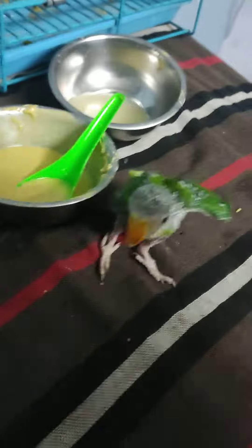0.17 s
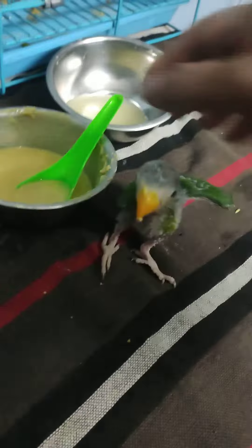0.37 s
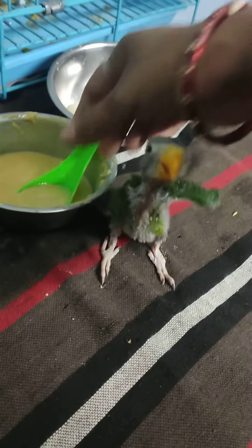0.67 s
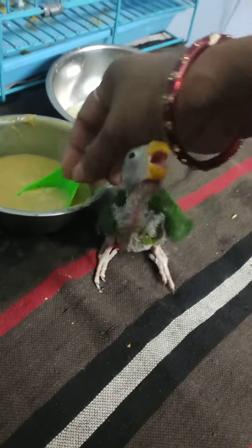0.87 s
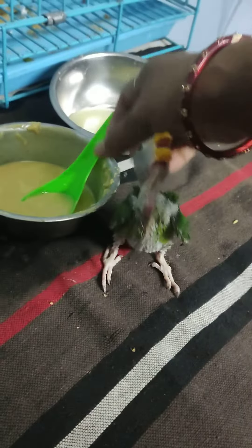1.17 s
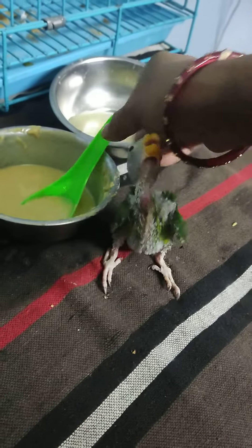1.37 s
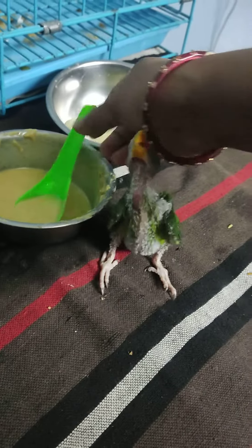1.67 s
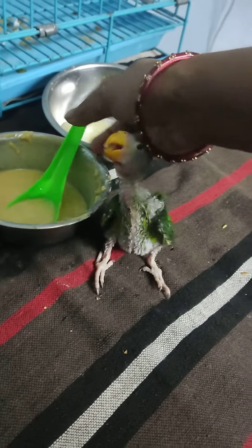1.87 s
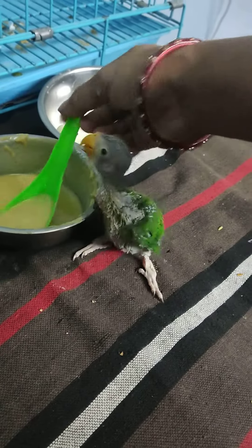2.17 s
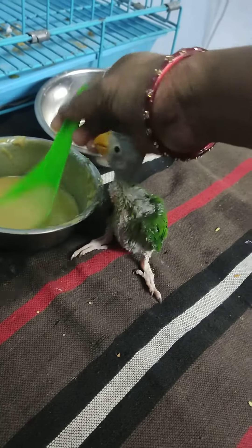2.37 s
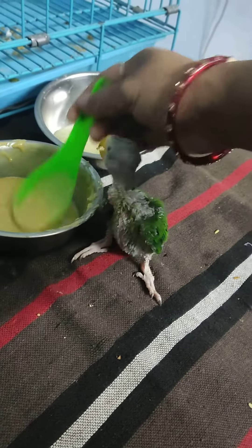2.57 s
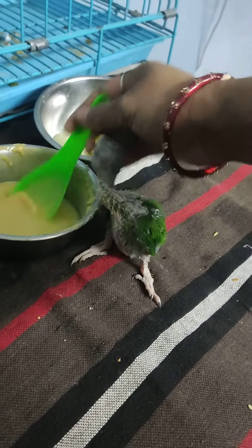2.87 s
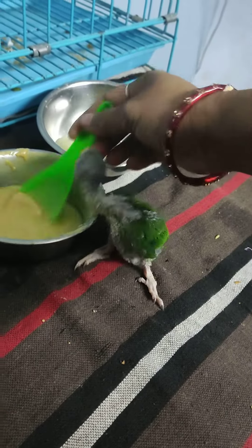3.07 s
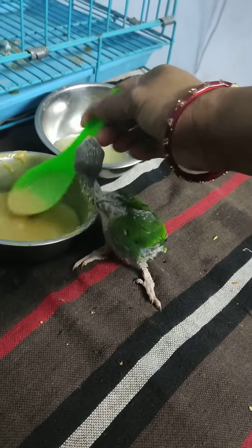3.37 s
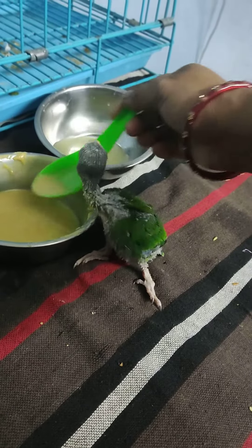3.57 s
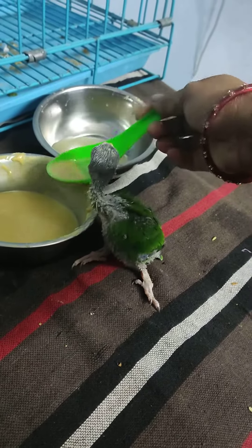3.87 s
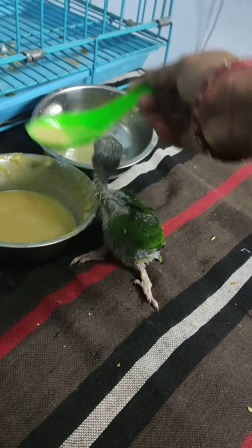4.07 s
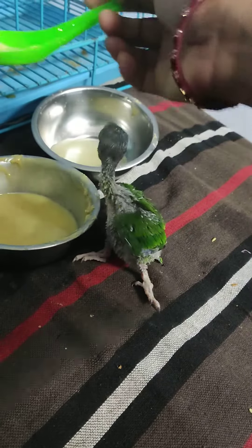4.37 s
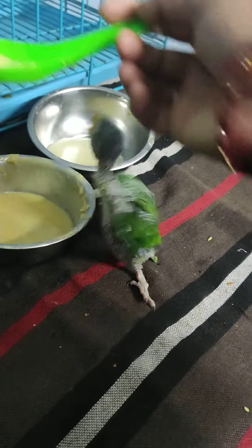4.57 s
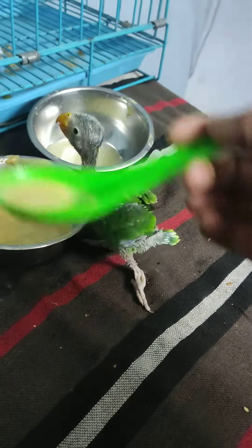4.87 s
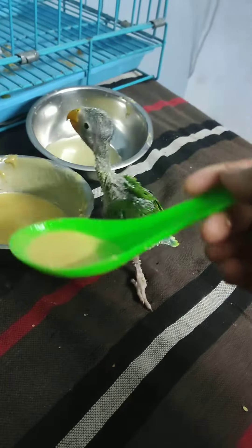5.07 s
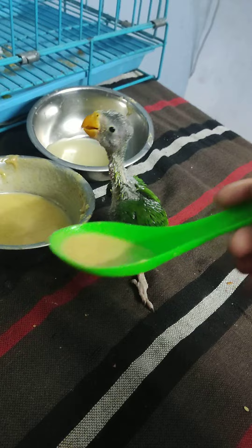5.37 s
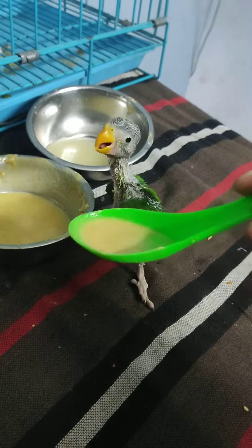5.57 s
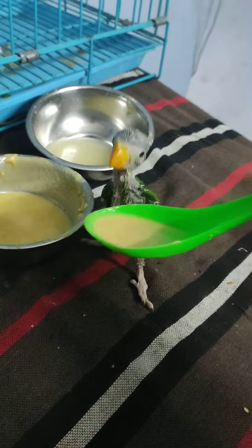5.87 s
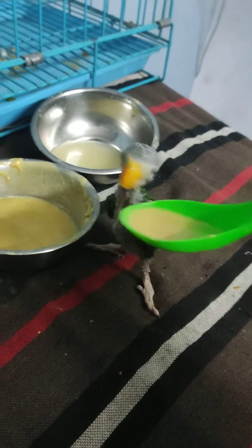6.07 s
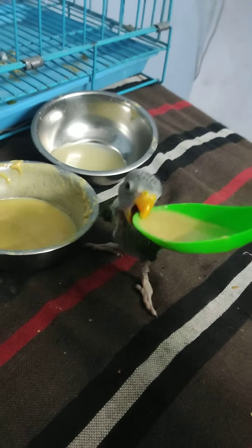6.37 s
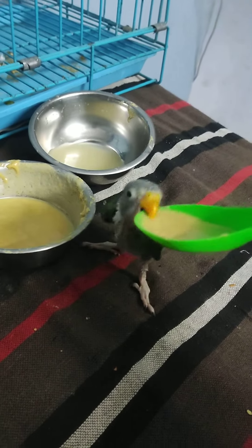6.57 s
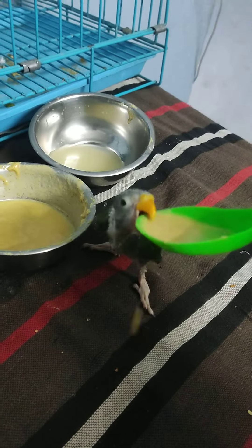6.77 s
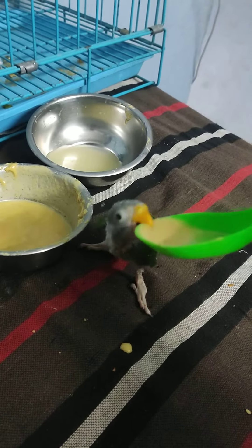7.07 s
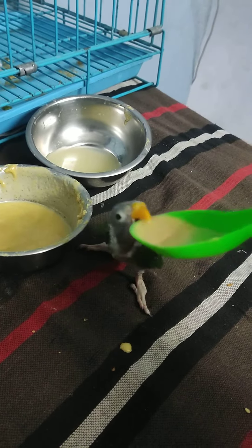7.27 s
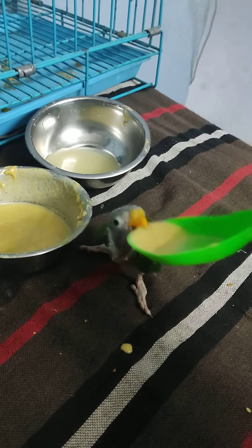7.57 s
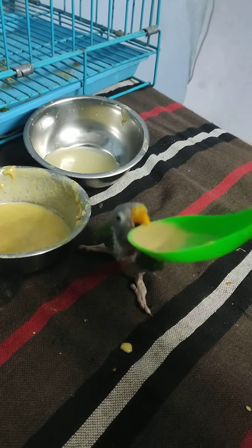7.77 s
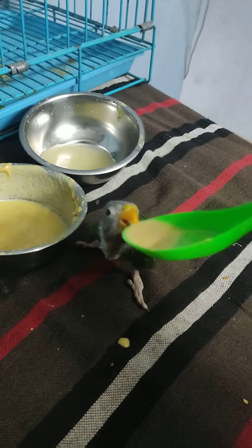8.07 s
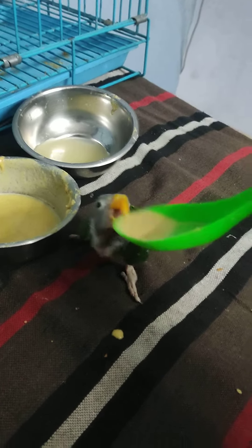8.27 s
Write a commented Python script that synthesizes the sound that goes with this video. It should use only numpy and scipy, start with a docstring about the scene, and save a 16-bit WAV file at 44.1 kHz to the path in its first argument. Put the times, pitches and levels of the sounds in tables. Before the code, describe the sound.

Young parrot chicks give raspy, rising begging cries about once a second in a small room, over dull air noise and hand rumble.

```python
"""Parrot chicks beg beside steel bowls in a small room, over dull air noise, a wavering hum and hand rumble.
The input fades up; beak and claw ticks, soft scuffs and bumps of fingers on the hand-held recorder follow.
Cries: harmonic partials and pulsed noise pass a throat and beak filter. Each opens in a rasp, clears into
a rising whistle, breaks hoarse, flicks up and collapses; a second voice overlaps some.
Air, rumble, ticks and scuffs are filtered noise; bumps are short pulses; the hum is a sine."""
import sys
import numpy as np
from scipy import signal
from scipy.fft import rfft, irfft, next_fast_len
from scipy.io import wavfile
from scipy.ndimage import uniform_filter1d

SR = 44100
rng = np.random.default_rng(int(sys.argv[2]) if len(sys.argv) > 2 else 0)


def store_pcm(level_fs):
    """Save levels as 16-bit WAV."""
    pcm = np.round(np.clip(level_fs, -1, 1) * 32767).astype(np.int16)
    wavfile.write(sys.argv[1], SR, np.atleast_2d(pcm).T)


N = 370881
TIME = np.arange(N) / SR
CUTOFF_HZ = 14450


def from_db(db):
    """Decibels to gain."""
    return 10 ** (np.asarray(db) / 20)


def rms_one(x):
    """Scale to rms 1."""
    return x / np.sqrt(np.mean(x ** 2) + 1e-20)


def at_hz(points, hz):
    """Interpolate a table over log frequency."""
    knots_hz, values = np.transpose(points)
    return np.interp(np.log(np.maximum(hz, 1)), np.log(np.maximum(knots_hz, 1)), values)


def shaped(x, gain):
    """Filter by a gain that is a function of frequency."""
    size = next_fast_len(x.shape[-1] + 2048)   # padding limits wrap-around
    spectrum = rfft(x, size) * gain(np.fft.rfftfreq(size, 1 / SR))
    return irfft(spectrum, size)[..., :x.shape[-1]]


def wobble(size, rate_hz):
    """Low-passed random motion, -6 dB at rate_hz; rms 1."""
    return rms_one(shaped(rng.standard_normal(size), lambda hz: 1 / (1 + (hz / rate_hz) ** 2)))


def swells(rows):
    """Sum of Gaussian rises of level; rows of centre/s, standard deviation/s, peak/dB."""
    return sum(from_db(db) * np.exp(-.5 * ((TIME - s) / sd_s) ** 2) for s, sd_s, db in rows)


def step(t, width_s):
    """A smooth step from 0 to 1 around time 0."""
    return .5 + .5 * np.tanh(t / (2 * width_s))


def room_noise(air_db=-49.5, hum_hz=196, hum_db=-63, swell_db=-1):
    """Steady dull air noise, alike at both ports in the bass, and a hum wavering in pitch and level."""
    # air noise spectrum: f/Hz, relative density/dB
    air_colour = [(15, -26.5), (25, 0), (81, -7.5), (161, -9.5), (184, -11), (216, -13.5), (247, -8.5),
                  (275, -12), (432, -14.5), (468, -16.5), (959, -17), (2020, -25), (3180, -34), (5130, -35),
                  (14500, -54.5)]
    # likeness of air noise at the two ports: f/Hz, correlation/1 (negative values act as 0)
    air_likeness = [(60, 0.49), (180, 0.87), (550, 0.058), (1650, -0.08), (4970, -0.03), (15000, -0.12)]
    # hum swells: centre t/s, standard deviation/s, peak level/dB before swell_db
    hum_swells = [(0.92, 0.068, -49.5), (4.25, 0.067, -54), (5.38, 0.033, -52), (6.2, 0.047, -44)]

    def coloured(sign):
        """Noise that the ports share (sign > 0) or hear in opposition (sign < 0)."""
        def gain(hz):
            """Air colour, split by likeness."""
            likeness = np.clip(at_hz(air_likeness, hz), 0, .95)
            return from_db(at_hz(air_colour, hz)) * np.sqrt(1 + sign * likeness)
        return shaped(rng.standard_normal(N), gain)

    opposed = coloured(-1.1) * np.array([[1], [-1]])
    air = rms_one(coloured(1) + opposed)
    phase = 2 * np.pi * np.cumsum(hum_hz * (1 + .015 * wobble(N, 12))) / SR
    hum_level = from_db(hum_db + 3.6 * wobble(N, 4.6)) + from_db(swell_db) * swells(hum_swells)
    hum = np.sqrt(2) * np.sin(phase) * hum_level
    return from_db(air_db) * air + hum


def handling(hold_db=-52, left_db=-1, right_db=-11, bump_db=-1, lumps_db=3, bump_leak=0.067):
    """The hand rumbles (low-passed noise) and fingers bump on the case, mostly at the left port."""
    # rumble spectrum before the 600 Hz roll-off: f/Hz, relative density/dB
    grip_colour = [(12, -30.5), (20, 3), (84, -1.5), (241, -12), (325, -20.5), (354, -25.5), (559, -21),
                   (600, -41), (780, -65), (1320, -120)]
    # grip shifts: centre t/s, standard deviation/s, peak level/dB before the port gains
    shifts = [(.15, .09, -43), (.49, 0.046, -39), (.75, 0.12, -39.5), (1.38, 0.037, -38.5), (1.6, .13, -47),
              (2.06, .07, -46), (2.55, 0.028, -46), (2.79, 0.063, -37.5), (3.48, 0.092, -38),
              (3.97, .03, -41.5), (4.2, .08, -41), (4.38, 0.043, -36), (4.76, 0.046, -45), (5.08, .05, -44),
              (5.49, 0.085, -39.5), (6.26, 0.11, -48), (6.75, .05, -42.5), (7.07, 0.064, -36.5),
              (7.52, 0.16, -38.5), (8.28, .1, -42.5)]
    # finger bumps: t/s, peak level/dB before bump_db, pulse f/Hz
    bump_rows = [(0.501, -25, 93), (0.677, -25, 74), (0.974, -26.5, 94), (1.344, -25.5, 87),
                 (1.362, -21.5, 93), (1.425, -24, 88), (2.763, -25.5, 130), (2.815, -23, 120),
                 (3.454, -23, 95), (4.348, -26, 102), (4.393, -21.5, 142), (6.963, -24, 63),
                 (7.047, -20.5, 66), (7.07, -23.5, 55), (7.315, -24, 63), (7.413, -24, 152)]

    # hold_db: resting hand, before the port gains; lumps_db: rms level unevenness
    level = (from_db(hold_db) + swells(shifts)) * from_db(lumps_db * wobble(N, 35))

    def grip_gain(hz):
        """Gain of hand on case."""
        return from_db(at_hz(grip_colour, hz)) / (1 + (hz / 600) ** 4)

    rumble = rms_one(shaped(rng.standard_normal((2, N)), grip_gain))
    bumps = np.zeros(N)
    for s, db, hz in bump_rows:
        near = np.abs(TIME - s) < .05
        push = (np.pi * hz * (TIME[near] - s) / np.sqrt(2)) ** 2
        pulse = (1 - 2 * push) * np.exp(-push)   # one soft push and its rebound
        bumps[near] += from_db(db + bump_db) * pulse * rng.choice([-1, 1])
    return rumble * level * from_db([[left_db], [right_db]]) + bumps * np.array([[1], [bump_leak]])


def small_sounds(tick_db=-4, tick_s=0.0011, scuff_db=-1, low_hz=3500, high_hz=7500):
    """Beak and claw ticks, scuffs of spoon and feathers: band-passed noise under decays and swells."""
    # ticks: onset t/s, peak level/dB before tick_db and filter
    ticks = [(0.132, -37), (0.56, -51), (0.754, -47), (0.937, -34.5), (1.7665, -42.5), (6.973, -48),
             (7.221, -53), (7.3483, -47), (7.6056, -50.5), (8.3344, -52)]
    # scuffs: centre t/s, standard deviation/s, peak level/dB before scuff_db and filter
    scuffs = [(0.78, 0.061, -74), (3.08, 0.033, -67), (3.22, 0.031, -65), (3.48, 0.02, -60.5),
              (4.19, 0.028, -65.5), (4.94, .03, -64), (5.17, .02, -70), (6.11, 0.015, -65),
              (6.25, 0.17, -67.5)]
    level = from_db(scuff_db) * swells(scuffs)
    for s, db in ticks:
        decay = np.exp(-np.abs(TIME - s) / tick_s) * (TIME >= s)
        level += from_db(db + tick_db) * decay
    band = signal.butter(1, [low_hz, high_hz], "band", fs=SR, output="sos")
    return 2 * signal.sosfilt(band, level * rng.standard_normal((2, N)))


def gesture(t, timing, pitches, levels):
    """The course all cries share: pitch/Hz, then fundamental, overtones, third partial, doubling, rasp/dB."""
    rise_s, flick_s, collapse_s, collapse_hz = .034, .009, .018, 681
    switch_s = .0025   # time the syrinx takes to jump between kinds of vibration
    rasp_swell_db_per_s, tone_swell_db_per_s = 75, 300   # both swell until the voice clears
    fundamental_db_per_octave = 17   # the fundamental gains as it rises
    fundamental_db, overtones_db, doubling_db, rasp_db = -3, -3, -4, -3   # trims on the table levels
    _, length, clears, breaks, flick_lead = timing
    opening_hz, crest_hz, steepest, flick_hz = pitches
    fundamental, early_tone, late_tone, doubling, opening_rasp, clear_rasp, broken_rasp, last_rasp = levels
    flick = length - flick_lead
    borders = np.sort([clears, breaks, flick - flick_s, flick + flick_s])

    def staged(*values):
        """One value for each stage: opening, clear, broken, flick, collapse."""
        return values[0] + np.diff(values) @ step(t - borders[:, None], switch_s)

    rise = opening_hz + (crest_hz - opening_hz) * step(t - steepest, rise_s)
    pitch = rise + (flick_hz - rise) * np.exp(-.5 * ((t - flick) / flick_s) ** 2)
    pitch = pitch * (collapse_hz / pitch) ** np.clip(1 - (length - t) / collapse_s, 0, 1)

    before = np.maximum(clears - t, 0)
    low = fundamental + fundamental_db + staged(0, 0, 0, 0, -8)   # weakens in the collapse
    low += fundamental_db_per_octave * np.log2(rise / 1500)
    high = np.interp(t, [clears, flick], [early_tone, late_tone]) + overtones_db
    high += staged(0, 0, -3.5, 2, -9) - tone_swell_db_per_s * before
    third = staged(1.5, 1.5, 1.5, 10, 10)   # the third partial leads, most of all from the flick on
    rasp = staged(opening_rasp, clear_rasp, broken_rasp, broken_rasp - 3.5, last_rasp)
    rasp += rasp_db - rasp_swell_db_per_s * before
    # outside the break, doubling lies 15 dB under the rasp
    broken = staged(0, 0, 0.98, 0, 0)
    doubled = broken * (doubling + doubling_db) + (1 - broken) * (rasp - 15)
    return pitch, low, high, third, doubled, rasp


def tract(hz, beak, beak_width_hz=420, hollow_hz=2950, hollow_width_hz=330):
    """Gain of throat and beak: the beak resonates, and when open hollows out one band."""
    # throat response: f/Hz, relative level/dB
    throat = [(600, -23.5), (1000, -15.5), (1600, -16.5), (2200, -9), (2700, -7.5), (3200, -11), (4100, -4),
              (5000, -5.5), (6100, -10.5), (7000, -16), (8200, -21.5), (9400, -40), (10500, -25),
              (13800, -26.5)]
    beak_hz, lift_db, hollow_db, treble_db, _ = beak
    lift = lift_db / (1 + ((hz - beak_hz) / beak_width_hz) ** 2)
    hollow = hollow_db / (1 + ((hz - hollow_hz) / hollow_width_hz) ** 2)
    treble = treble_db * np.clip(np.log2((hz + 1) / beak_hz), 0, 1)
    gain = from_db(at_hz(throat, hz) + lift + hollow + treble)
    return gain * (hz < CUTOFF_HZ) / (1 + (600 / (hz + 1)) ** 4)


def cry(timing, pitches, levels, beak, jitter=0.0043, rough_jitter=.012, shimmer=0.14, flutter_db=1.8,
        flutter_hz=170, attack_s=.009, edge_s=0.0025, pulsing=0.53, smear_hz=130, hiss_share=0.42):
    """The syrinx goes from clean vibration through period doubling to a chaotic rasp, via throat and beak."""
    # head position: t/s, delay at the right port/s
    head_lag = [(0.15, 0.00019), (0.95, .00023), (1.8, 0.00022), (2.7, 0.00015), (3.65, 0.000061),
                (4.5, 0.0001345), (5.4, .0002), (7.75, .00014)]
    start, length = timing[:2]
    span = np.flatnonzero((TIME > start - edge_s) & (TIME < start + length + edge_s))
    t, size = TIME[span] - start, len(span)
    pitch, low, high, third, doubled, rasp = gesture(t, timing, pitches, levels)

    # the pitch is least steady where the rasp outweighs the tone
    chaos = 1 / (1 + from_db(high - rasp) ** 2)
    unsteady = 1 + (jitter + rough_jitter * chaos) * wobble(size, 260)
    phase = 2 * np.pi * np.cumsum(pitch * unsteady) / SR

    def partials(multiples, wander=0, lead_db=0):
        """Sines on multiples of the pitch, weighted by the tract; rms 1."""
        column = multiples[:, None]
        leads = np.ceil(column) == 3   # the third, or the half partial just under it
        gains = tract(column * pitch, beak) * from_db(lead_db * leads)
        waves = np.sin(column * phase + wander + rng.uniform(0, 2 * np.pi, (len(multiples), 1)))
        return (gains * waves).sum(axis=0) / np.sqrt((gains ** 2).sum(axis=0) / 2 + 1e-20)

    multiples = np.arange(2, 14)
    tone = from_db(low) * np.sqrt(2) * np.sin(phase)
    tone += from_db(high) * partials(multiples, lead_db=third)
    tone += from_db(doubled) * partials(np.append(.5, multiples - .5), lead_db=5)
    tone *= 1 + shimmer * wobble(size, 120)

    # air escapes in puffs, once a cycle, and the puffs come in uneven clumps
    clumps = from_db(flutter_db * wobble(size, flutter_hz))
    puffs = rng.standard_normal(size) * (1 + pulsing * np.cos(phase)) * clumps
    hiss = rms_one(shaped(puffs, lambda hz: tract(hz, beak)))
    # in the rasp the whole and half partials also lose their lock and smear
    loose = np.arange(3, 12) / 2
    drift = uniform_filter1d(rng.standard_normal((len(loose), size)), size=40)
    wander = np.cumsum(drift, axis=1) * np.sqrt(2 * np.pi * smear_hz / SR)
    hoarse = np.sqrt(hiss_share) * hiss + np.sqrt(1 - hiss_share) * partials(loose, wander)

    # the air takes a moment to get going
    gate = np.clip(np.minimum((t - t[0]) / attack_s, (t[-1] - t) / (2 * edge_s)), 0, 1)
    voice = (tone + from_db(rasp) * hoarse) * gate
    # path difference to the right port, set for each cry
    lag_s = np.interp(start, *np.transpose(head_lag))
    late = shaped(voice, lambda hz: np.exp(-2j * np.pi * hz * lag_s))
    pan_db = beak[-1]
    out = np.zeros((2, N))
    out[:, span] = np.array([voice, late]) * from_db([[pan_db / 2], [-pan_db / 2]])
    return out


def room(x, wet_db=-18.0, early_db=-15, early_s=.006, wall_hz=6500, t60_s=0.31):
    """Bowls and cage throw back quick echoes; the walls add a duller tail: decaying noise, convolved."""
    t = TIME[:SR * 2 // 3]
    early = rng.standard_normal((2, len(t))) * np.exp(-t / early_s) * (t > .001)
    tail = rng.standard_normal((2, len(t))) * from_db(-60 * t / t60_s) * (t > .008)
    tail = shaped(tail, lambda hz: 1 / np.sqrt(1 + (hz / wall_hz) ** 4))
    echoes = from_db(early_db) * rms_one(early) + from_db(wet_db) * rms_one(tail)
    echoes /= np.sqrt(len(t))   # levels become energies relative to the direct sound
    return signal.fftconvolve(x, echoes, axes=1)[:, :N]


def ports(x):
    """The two microphone ports colour the birds differently."""
    # port response: f/Hz, left-right level/dB
    port_balance = [(800, 0.5), (2000, 2), (3000, -3.5), (4200, -10.5), (5500, -13), (6300, -13.5),
                    (7300, 4), (8500, 17.5), (10000, -3), (12000, -1), (14000, 4)]

    def gains(hz):
        """Left and right response, of equal total power."""
        ratio = from_db(at_hz(port_balance, hz))
        return np.array([ratio, np.ones_like(hz)]) * np.sqrt(2 / (1 + ratio ** 2))
    return shaped(x, gains)


def scene():
    """Air, hum, handling and small noises, with the chicks in their room."""
    # one row per cry, four groups; levels before the trims in gesture():
    #   timing: start t/s, length/s, clears after/s, breaks after/s, flick before the end/s
    #   pitch: opening f/Hz, crest f/Hz, steepest after/s, flick f/Hz
    #   levels: fundamental/dB, overtones on clearing/dB, overtones at flick/dB, period doubling/dB,
    #           rasp while opening/dB, clear/dB, broken/dB, collapsing/dB
    #   beak: resonance f/Hz, its lift/dB, hollow/dB, treble/dB, left-right level/dB
    cries = [ ((.152, .251, 0.074, 0.146, .024), (1170, 1990, .139, 2090),
             (-40, -25, -28, -25, -27, -43, -27, -24), (4200, 1.5, 3, -4, -3)),
             ((.953, .217, 0.12, .16, .04), (1300, 1560, .15, 1570),
             (-43, -17, -24, -42, -18.5, -24, -31, -36), (4150, 6, -3, -2, 3.5)),
             ((1.0, .249, .12, .14, .026), (1250, 1900, .125, 1990),
             (-34, -36, -32, -22, -26, -29.5, -34, -27), (4450, 6, -3, -1.5, 2.5)),
             ((1.813, .257, 0.07, 0.206, .027), (1103, 1860, .118, 2130),
             (-37, -26, -31, -28, -19.5, -44, -35, -26), (3700, 2, -3, -2, 1.5)),
             ((2.695, .257, .06, 0.117, .028), (1172, 2011, .138, 2100),
             (-43, -24, -26.5, -37, -26, -36, -27, -28), (5300, 1, 1, 0, -1.5)),
             ((2.81, .218, .07, .14, .022), (1200, 1800, .11, 1900),
             (-54.5, -44, -48, -50, -31, -35, -36.5, -38), (2700, 5, 0, -3, 0.5)),
             ((3.655, .252, .105, .16, .025), (1152, 2028, .143, 2100),
             (-45, -35, -28, -38, -20, -22, -25.5, -28), (6060, 15, 0, 4.6, .5)),
             ((4.49, .222, .027, .097, .022), (1149, 1747, .117, 1800),
             (-40, -24, -36, -31, -30, -44, -26, -26), (5750, 4, -7, 0, -3)),
             ((4.585, .233, .045, .19, .035), (1225, 1690, .101, 1800),
             (-43, -21, -31, -42, -24.5, -34, -31, -26), (4300, 6, -7, 1, -0.5)),
             ((5.38, .198, 0.015, 0.074, .018), (1179, 2050, .121, 2050),
             (-38, -19, -32, -31, -25, -42, -26, -18), (3700, 0, -5, -5, 4)),
             ((5.49, .218, 0.044, .175, .034), (1057, 1675, .077, 1820),
             (-38, -22, -30, -42, -25.5, -36, -31, -23), (3920, 7.5, -5, 3, 1.5)),
             ((6.369, .271, .06, .18, .047), (966, 1526, .092, 1774),
             (-32, -15.5, -24, -29, -17.5, -27, -23, -25), (4300, 3, -2, -3, 1.5)),
             ((7.74, .218, 0.054, 0.093, 0.0179), (1158, 2050, .13, 2000),
             (-39, -22.5, -30, -29, -24, -20, -31, -21), (3870, 5, 0, -2, -.5)),
             ((7.82, .212, .05, .125, .03), (1103, 1604, .048, 1829),
             (-35, -18, -29, -30, -23, -45, -33, -24), (4100, 5, 0, -3, -2.5))]
    chicks = sum(cry(*row) for row in cries)
    return room_noise() + handling() + small_sounds() + ports(chicks + room(chicks))


def record(dry, open_s=0.062, fade_s=0.16):
    """The input fades up linearly at the start; a steep low-pass cuts the top."""
    fade = np.clip((TIME - open_s) / fade_s, .003, 1)
    low_pass = signal.ellip(10, .1, 70, CUTOFF_HZ, fs=SR, output="sos")
    return signal.sosfilt(low_pass, dry * fade)


dry = scene()
out = record(dry)
store_pcm(out)
```